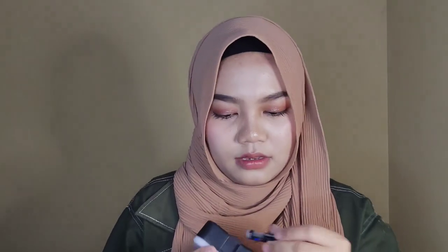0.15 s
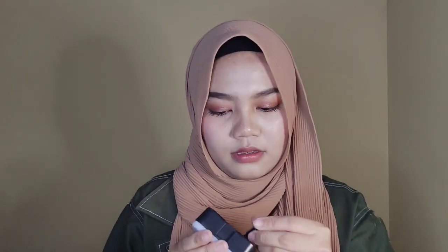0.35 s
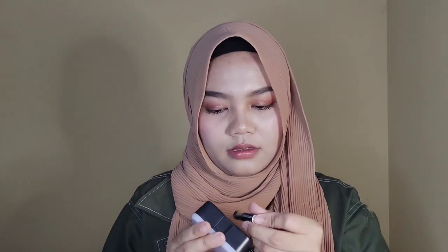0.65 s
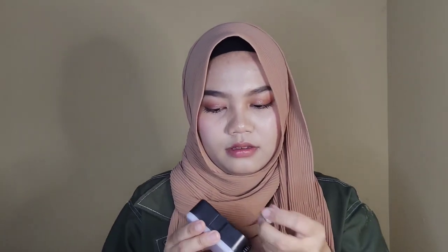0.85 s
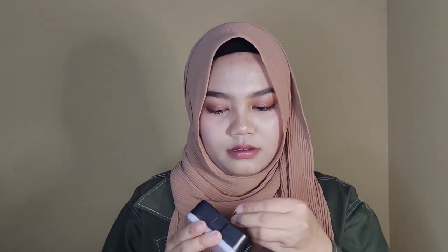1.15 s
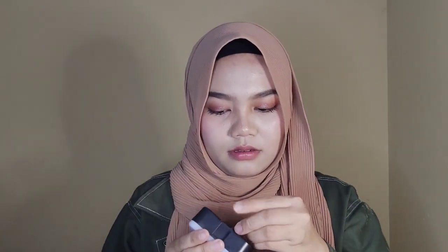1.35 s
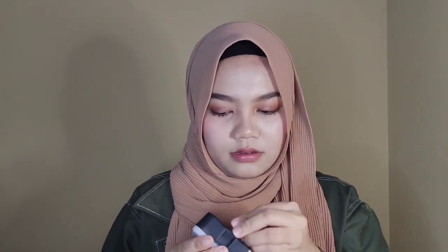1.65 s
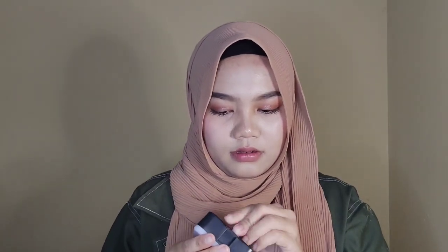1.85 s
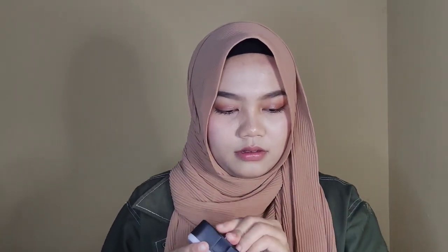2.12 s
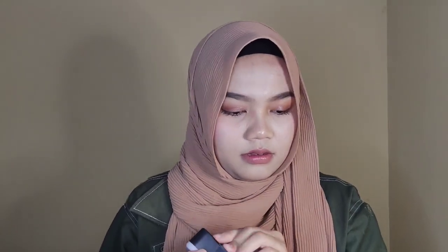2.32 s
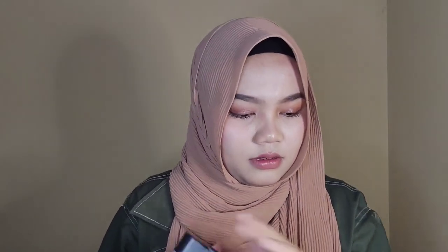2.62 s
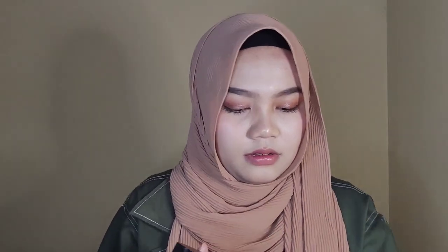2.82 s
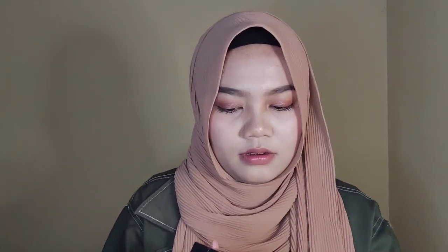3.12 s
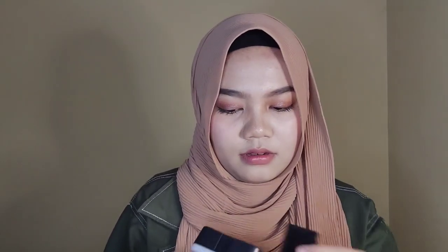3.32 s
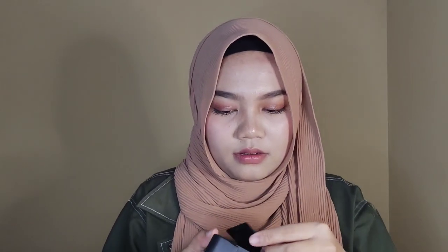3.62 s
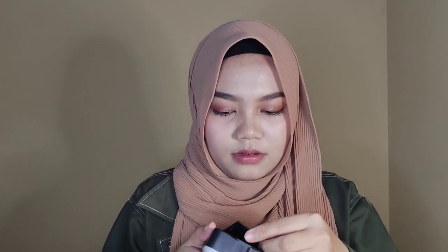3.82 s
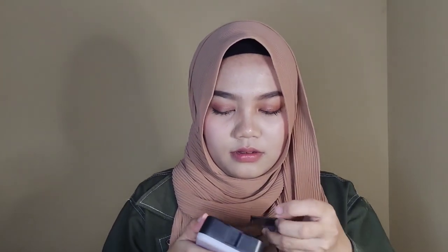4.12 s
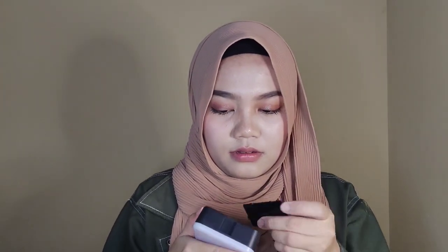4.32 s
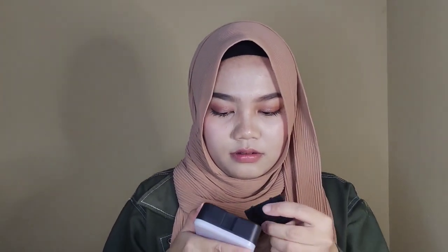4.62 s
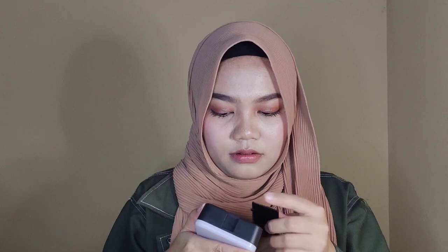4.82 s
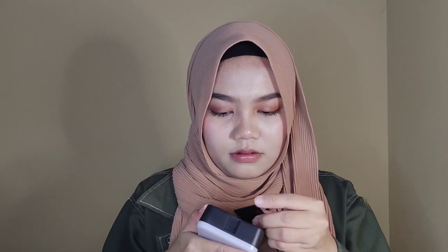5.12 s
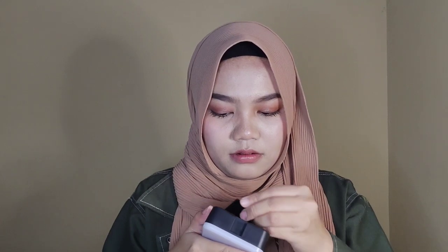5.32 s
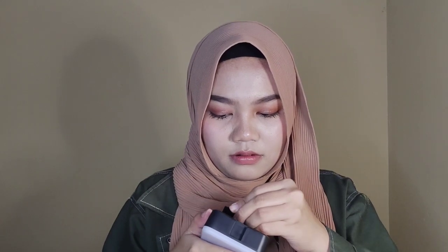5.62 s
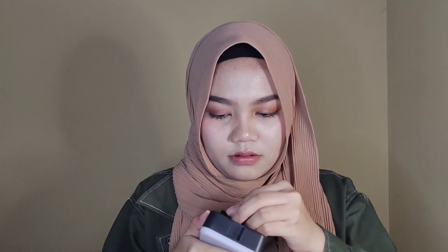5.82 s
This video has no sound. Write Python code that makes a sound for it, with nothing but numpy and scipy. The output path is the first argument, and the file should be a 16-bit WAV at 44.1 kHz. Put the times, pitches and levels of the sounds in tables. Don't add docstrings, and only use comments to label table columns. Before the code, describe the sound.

Small hard plastic clicks and taps, irregularly spaced, as batteries and a lid are pressed into a hollow case in a humming room.

```python
import sys
import numpy as np
from scipy import signal
from scipy.fft import rfft, irfft, next_fast_len
from scipy.io import wavfile
from scipy.ndimage import uniform_filter1d, map_coordinates

SR = 44100
rng = np.random.default_rng(int(sys.argv[2]) if len(sys.argv) > 2 else 0)


def master(y):
    cut = np.clip(np.atleast_2d(y).T, -1, 1)
    pcm = np.round(cut * 32767)
    wavfile.write(sys.argv[1], SR, pcm.astype(np.int16))


def to_linear_factor(level_db):
    exponent = np.asarray(level_db, float) / 20
    return 10 ** exponent


N = 262727

# f/Hz, level/dB per Hz
AIR = [(12, -36), (22, 0.5), (36, 1.5), (50, 0), (72, -7.5), (135, -13), (200, -17), (260, -20),
       (370, -23.5), (600, -31), (800, -61), (1300, -120)]
HISS = [(240, -33), (400, -11.5), (577, -3.5), (660, -7), (927, -7), (1000, -9), (3510, -15.5),
        (3790, -17.5), (4090, -16.5), (6250, -21.5), (6700, -14.5), (7200, -21), (8400, -26.5),
        (13700, -21.5), (15400, -22)]
# f/Hz, correlation/1
ALIKE = [(30, 0.081), (100, 0.87), (300, 0.29), (1000, 0.067), (10000, 0.024)]
# f/Hz, level/dB, waver rate/Hz
HUM = [(98.7, -56.5, 2.65), (199.4, -80.5, 18), (301.6, -74.5, 6.9)]
# f/Hz, level/dB
MIC_TOP = [(14200, 3.5), (14600, -14), (15600, -34)]

# t/s (fastest), rise/s, fall/s, level/dB, tilt to bright/dB
RUSTLE = [
    (0.031, 0.1, 0.12, -70.5, 0.5),
    (2.44, 0.2, 0.064, -78, -5),
    (3.02, 0.06, 0.058, -65, 5),
    (3.15, 0.028, 0.096, -65.5, 5),
    (3.42, 0.11, .1, -75, -5),
    (4.0, 0.31, 0.076, -74.5, -1.5),
    (4.25, 0.043, .07, -76, 6),
    (4.49, .07, .04, -75, 4.5),
    (4.87, .07, 0.071, -82, 5),
    (5.5, 0.13, 0.17, -81, -1),
]
# f/Hz, level/dB
DULL = [(400, -1.5), (900, 2.0), (1500, -6.0), (2000, -2.5), (2700, -5.5), (3800, -7.5), (8000, -37)]
BRIGHT = [(2500, -14), (4500, -4), (9000, -12), (14000, -10.5), (16000, -32)]
RAIL = [(1200, -28), (1800, -2), (2020, 0.5), (2300, -14), (3200, -27)]

# t/s, strength level/dB, hardness/dB per octave above 1000 Hz, hollowness at 650 Hz/dB
NUDGES = [
    (.3721, -52.5, -11.5, -2),
    (.4364, -47, -9.5, -26),
    (.8894, -76, -0.5, -8),
    (1.3418, -51.5, -7.5, 10),
    (1.4172, -37.5, -5, -12),
]
GRAZES = [
    (.3774, -48, -7.5, -1),
    (.4174, -61.5, -3, 8),
    (.4784, -64, -9, 1),
    (1.4097, -45.5, -3.5, -17),
]
SEATINGS = [
    (1.5957, -24, -9.5, -16),
    (1.8774, -65.5, 2.2, 4),
    (1.9785, -40.5, -11, -9.5),
    (2.0522, -38, -9, -12.1),
    (2.3355, -55, -4, -4),
]
SNAP = [
    (2.4334, -47, -3, -6.5),
    (2.4943, -20, -4, -12),
    (2.5034, -20.5, -5, -4.5),
]
TWANG = [
    (1.7664, -61, 4.5, -4.2),
    (2.9774, -60, -3, -1),
    (3.1363, -52.5, -1.0, -20),
]
LID_TAPS = [
    (3.5331, -41.5, -2, 5),
    (3.5482, -56, -4.4, -9.7),
    (3.5816, -64, 3.5, 2.2),
    (4.8754, -81, 6, 3),
]
RIM_TAPS = [
    (3.7646, -39.5, -2.5, -31),
    (3.8696, -55, -2.7, -4),
    (3.9538, -50, -3.5, -15),
    (3.9682, -52.5, -1.1, -7),
    (4.3316, -69.5, 3.5, -2.2),
]
LID_SLIDES = [
    (5.615, -45.5, -10.5, -24),
    (5.7092, -54.5, -11, -16.5),
    (5.7306, -48.1, -6.1, -11),
    (5.7384, -33.5, -5, -15),
    (5.877, -65, -1.3, 2.5),
]
NAIL_TICKS = [
    (4.144, -59.5, -3, -25),
    (5.497, -51.5, -4, -12),
    (5.907, -38, -4.5, -27.1),
]

# f/Hz, level/dB, t60/s
EMPTY_CASE = [(636, -5, 0.26), (665, -14.5, 0.19), (935, -5, 0.068), (1340, -9.5, 0.065),
              (2084, -1.5, 0.037), (3836, 1, 0.022), (3560, -3, 0.015), (4540, -9, 0.0074)]
HALF_CASE = [(576, -0.5, 0.036), (872, 1.5, 0.0066), (946, 0.5, 0.058), (1333, -15, 0.025),
             (2000, 2.5, 0.01), (2430, -9, 0.033), (3430, -5.5, 0.017)]
FULL_CASE = [(549, -8, 0.03), (742, -5, 0.064), (891, -4, 0.059), (967, 3, 0.027), (1104, 0, 0.022),
             (2145, -1, 0.02), (2312, -2, 0.028), (3200, 1.5, 0.01), (3540, -6, 0.031)]
COIL = [(890, -4, 0.034), (2130, -8.5, 0.063), (3570, 8, 0.025), (7850, 3, 0.0069)]
LID = [(926, 5.5, 0.03), (991, 0.5, 0.032), (1280, -2.5, 0.023), (1776, 0, 0.017), (2374, -9, 0.028),
       (3000, -14, 0.024), (4100, -15, 0.0083)]
LID_RIM = [(913, 5.5, 0.024), (1170, 4.5, 0.012), (2136, -13, 0.026), (1586, -5.5, 0.014),
           (3240, -9, 0.027), (3980, -8, .02)]
LID_EDGE = [(545, -5.5, 0.075), (973, -1, 0.029), (1580, 4, 0.012), (2070, -4, 0.011), (2890, 4, 0.019),
            (3854, -2.5, 0.044)]
LID_CORNER = [(1640, -10, 0.017), (2060, -12, 0.027), (2770, 3, 0.012), (3970, -4, 0.017)]
# f/Hz, level/dB, t60/s
LINGER = [(545.6, -20.5, 0.28), (710, -37, 0.25), (842, -26, 0.87), (860, -29.5, 0.69)]
# f/Hz, level over the strike/dB
PLASTIC = [(500, -60), (1200, -2.5), (2500, 3.5), (4000, -1), (6000, 0.5), (9000, -2), (14000, -8)]
STEEL = [(500, -50), (1500, -9), (4000, 9.5), (6000, -3), (8000, 10), (10000, -7.5), (13000, 9),
         (15000, -7)]
# contacts, modes, crack colour, crack level/dB, crack t60/s,
# room level/dB, spring level/dB, wall level at 2200 Hz/dB, edge level at 3600 Hz/dB
STAGES = [
    (NUDGES, EMPTY_CASE, PLASTIC, 10.5, .018, 0.1, -12, -1.5, 13),
    (GRAZES, EMPTY_CASE, PLASTIC, 10.5, .018, 0.1, -12, -4, 1.5),
    (SEATINGS, HALF_CASE, PLASTIC, 8, .016, -.5, -6, 7.5, 7),
    (SNAP, FULL_CASE, PLASTIC, 9, .014, -.1, 0.1, 4, 3),
    (TWANG, COIL, STEEL, 9, .03, 1.5, -12, 5, -8),
    (LID_TAPS, LID, PLASTIC, 10.5, .018, -.1, -9, 10.5, 11),
    (RIM_TAPS, LID_RIM, PLASTIC, 7, .018, -.1, -9, 6.5, 6),
    (LID_SLIDES, LID_EDGE, PLASTIC, 11, .026, 0.1, -9, -1.5, 3.5),
    (NAIL_TICKS, LID_CORNER, PLASTIC, 4, .022, -2.5, -12, 9, 4),
]

# t/s, level/dB
BOUNCES = [
    [(.0011, -19.5), (.0032, -24), (.0052, -7)],
    [(.0016, -42), (.0027, -13.5), (.0058, -31)],
]
# f/Hz, half the left-right level/dB
PAN = [(700, 1), (2000, 1.2), (5000, -1)]
# f/Hz, t60/s
ROOM_T60 = [(300, 0.36), (700, 0.69), (2000, 0.57), (5000, 0.55), (12000, 0.23)]
# f/Hz, level under the direct sound/dB
ROOM_DB = [(300, 3.5), (560, 6), (900, -13), (2000, -7.5), (5000, -6.5), (12000, -1)]


def unit(x):
    return x / np.sqrt(np.mean(x ** 2) + 1e-20)


def along(points, hz):
    f, value = np.transpose(points)
    return np.interp(np.log(hz + 1), np.log(f + 1), value)


def wobble(rate):
    knots = rng.standard_normal(int(N * rate / SR) + 4)
    return map_coordinates(knots, [np.arange(N) * rate / SR])


def filtered(x, response):
    m = next_fast_len(x.shape[-1] + 8192)
    hz = np.fft.rfftfreq(m, 1 / SR)
    return irfft(rfft(x, m) * response(hz), m)[..., :x.shape[-1]]


def rush(spectrum, alike):
    def response(hz):
        turn = np.arccos(np.clip(along(alike, hz), -1, 1)) / 2
        return to_linear_factor(along(spectrum, hz)) * [np.cos(turn), np.sin(turn)]

    mid, side = filtered(rng.standard_normal((2, N)), response)
    return unit(np.array([mid + side, mid - side]))


def fan():
    now = np.arange(N) / SR
    hum = np.zeros(N)
    for hz, db, waver in HUM:
        level = to_linear_factor(db - 2.5 + 1.0 * wobble(waver))
        hum += level * np.sin(2 * np.pi * hz * now + 0.16 * wobble(waver))
    return hum * to_linear_factor([[-.3], [.3]])


def air():
    return to_linear_factor(-53.5 - 3.0) * rush(AIR, ALIKE)


def hiss():
    drift_db = .4 * wobble(3)
    return to_linear_factor(-74.5 + 3.5 + drift_db) * rush(HISS, ALIKE)


def rustle():
    now = np.arange(N) / SR
    dull = rush(DULL, [(1000, 0.37)])
    bright = rush(BRIGHT, [(1000, 0.2)])
    grain = unit(to_linear_factor(2.5 * wobble(300) + 1.2 * wobble(25)))
    strokes = np.zeros((2, N))
    for s, rise, fall, db, tilt in RUSTLE:
        away = (now - s) / np.where(now < s, rise, fall)
        swell = to_linear_factor(db - 8.6 * away ** 2)
        strokes += swell * (to_linear_factor(2.0 - tilt) * dull + to_linear_factor(tilt - 9) * bright)
    return grain * strokes


def strike(db, hardness, hollow, wall_db, edge_db):
    hz = np.array([650, 1000, 2200, 3600, 9000])
    slope = hardness * np.log2(np.maximum(hz / 1000, 1))
    return np.transpose([hz, db + slope + [hollow, 0, wall_db, edge_db, 0]])


def ring(modes, t, scatter_db, detune, attack):
    hz, db, t60 = np.transpose(modes)[:, :, None]
    level_luck, pitch_luck = rng.standard_normal((2, len(modes), 1))
    decay = to_linear_factor(db + scatter_db * level_luck - 60 * t / t60)
    waves = decay * np.sin(2 * np.pi * hz * (1 + detune * pitch_luck) * t)
    return waves.sum(axis=0) * (1 - np.exp(-t / attack))


def knock(blow, modes, crack, crack_db, skid, t):
    modes = np.array(modes, float)
    modes[:, 1] += along(blow, modes[:, 0])
    touch = 1 - np.exp(-(t / (0.00097 + skid / 15)) ** 2.26)
    grip = 0.66 + 0.68 * np.exp(-(t / 0.0065) ** 4)
    body = ring(modes, t, scatter_db=1, detune=.005, attack=.0003) * grip * touch
    a, b = rng.standard_normal((2, len(t)))
    burst = np.array([a + 0.22 * b, a - 0.66 * b]) * to_linear_factor(-60 * t / skid) * touch
    burst = filtered(burst, lambda hz: to_linear_factor(crack_db + along(crack, hz) + along(blow, hz)))
    return np.array([[body, body], burst])


def small_case(hz):
    s = 1j * hz / 450
    return (s ** 2 / (1 + s * 1.33 - (hz / 450) ** 2)) ** 2


def arrival(hz):
    paths = [sum(to_linear_factor(db) * np.exp(-2j * np.pi * hz * s) for s, db in port) for port in BOUNCES]
    side = np.array([[1], [-1]])
    lag_s = 3e-5
    direct = to_linear_factor(along(PAN, hz) * side) * np.exp(-1j * np.pi * hz * lag_s * side)
    return direct - paths


def walls(t):
    before_wall = -20 / (1 + (t / 0.0083) ** 8)
    bunch = 13.5 * np.exp(-t / 0.12)
    return before_wall + bunch + 14 * t


def tail(length):
    hz, t, z = signal.stft(rng.standard_normal((2, length)), SR, nperseg=256)
    decay = z * to_linear_factor(-60 * t / along(ROOM_T60, hz)[:, None] + along(ROOM_DB, hz)[:, None])
    echo = signal.istft(decay, SR, nperseg=256)[1][:, :length]
    echo = echo + 0.066 * echo[::-1]
    return echo * to_linear_factor(walls(np.arange(length) / SR) - 35.0)


def springs(t):
    humming = ring(LINGER, t, scatter_db=1, detune=.002, attack=.03)
    return humming * to_linear_factor(3.5 * np.interp(t, np.arange(25) / 40, rng.standard_normal(25)))


def taps():
    out = np.zeros((2, N + SR))
    t = np.arange(SR // 16) / SR
    long = np.arange(SR * 6 // 10) / SR
    brief = to_linear_factor(-60 * t / np.array([[.038], [.008]]))
    for contacts, modes, crack, crack_db, skid, room_db, spring_db, *part in STAGES:
        for s, db, hardness, hollow in contacts:
            blow = strike(db, hardness, hollow, *part)
            body, burst = filtered(knock(blow, modes, crack, crack_db, skid, t), small_case)
            near = filtered(body + burst, arrival)
            around = 1.64 * body[0] * brief[0] + 6.0 * burst[0] * brief[1]
            far = signal.fftconvolve(around[None], tail(len(long)), axes=1)[:, :len(long)]
            far = to_linear_factor(room_db) * far + to_linear_factor(db + spring_db) * springs(long) * [[1], [.7]]
            scuff = to_linear_factor(-23.5) * near[:, 299::-1] * np.hanning(300)
            start = round((s - .0015) * SR)
            out[:, start:start + len(t)] += near
            out[:, start - 250:start + 50] += scuff
            out[:, start:start + len(long)] += far
    return out[:, :N]


def scrape():
    now = np.arange(N) / SR
    start_s, end_s = 1.78, 2.5
    moving = uniform_filter1d(1. * (now > start_s) * (now < end_s), size=1500)
    press_db = 5.5 * (now - start_s)
    level = moving * to_linear_factor(-77.5 + press_db + 3.8 * wobble(39.93))
    return level * rush(RAIL, [(1000, 0.44)])


def scene():
    return fan() + air() + rustle() + taps() + scrape()


def low_pass(x):
    return signal.sosfilt(signal.butter(12, 15600, fs=SR, output="sos"), x)


def record(dry):
    mic = filtered(dry + hiss(), lambda hz: to_linear_factor(along(MIC_TOP, hz)))
    return low_pass(mic - .0002)


dry = scene()
out = record(dry)
master(out)
```